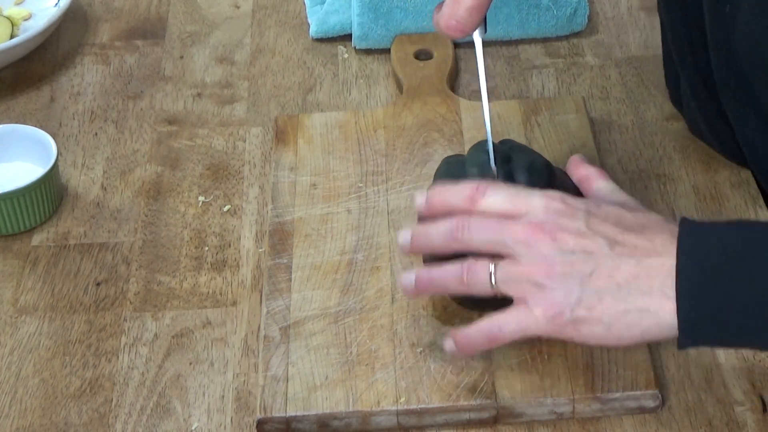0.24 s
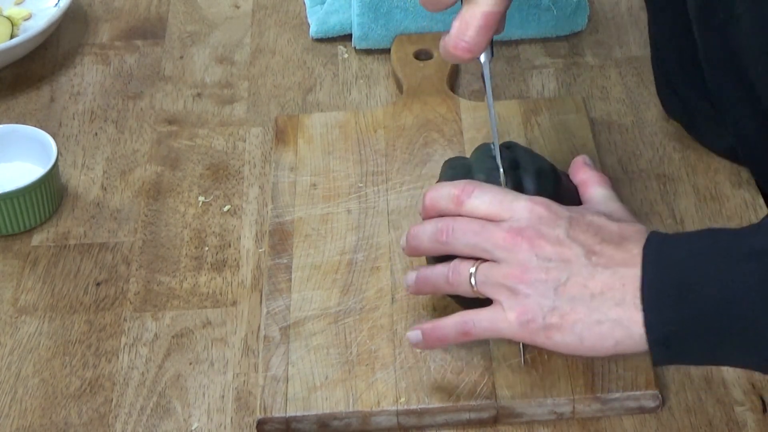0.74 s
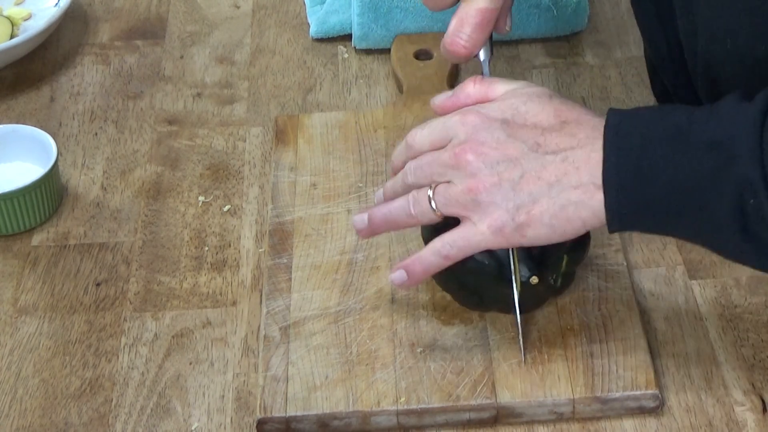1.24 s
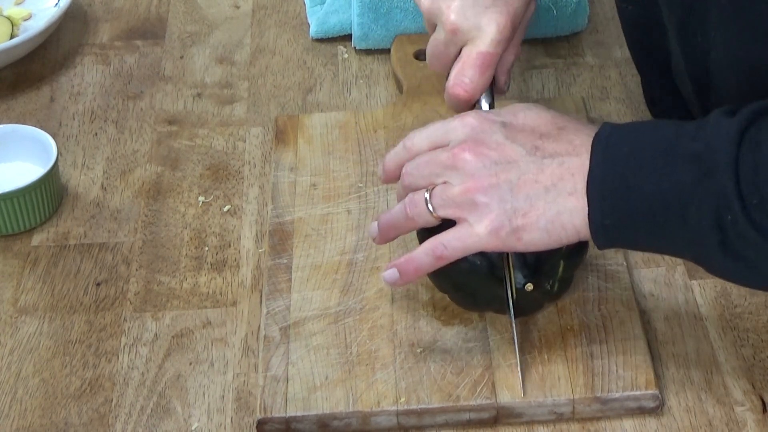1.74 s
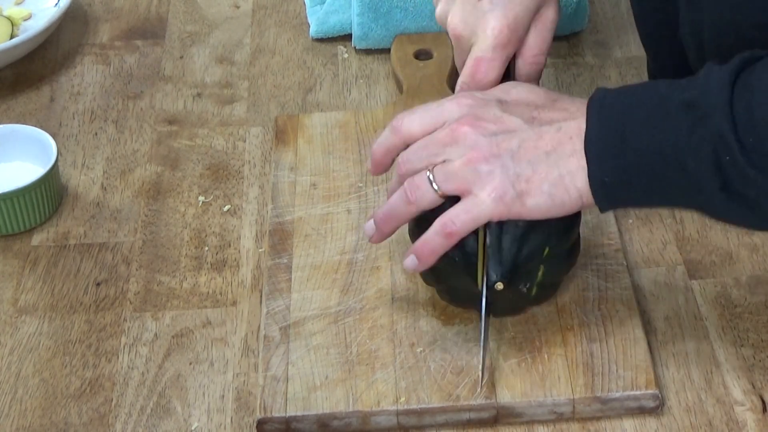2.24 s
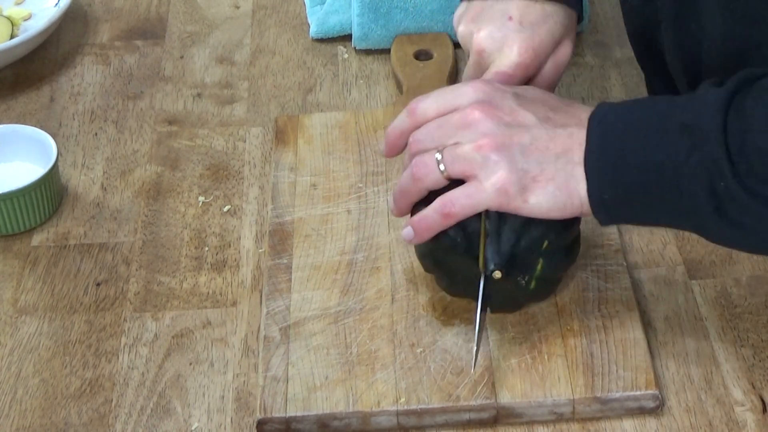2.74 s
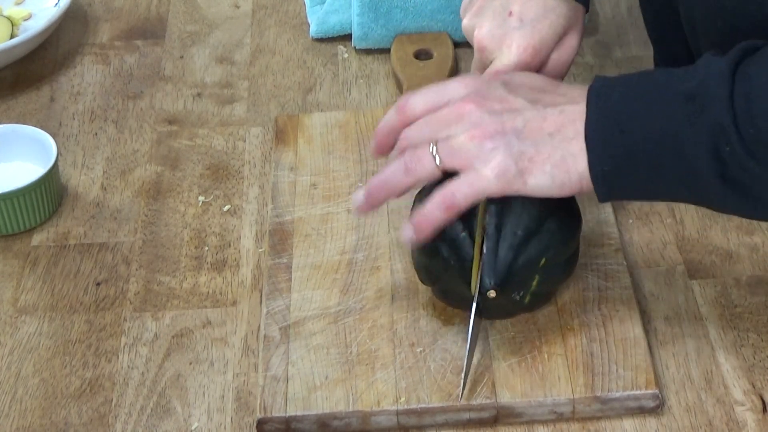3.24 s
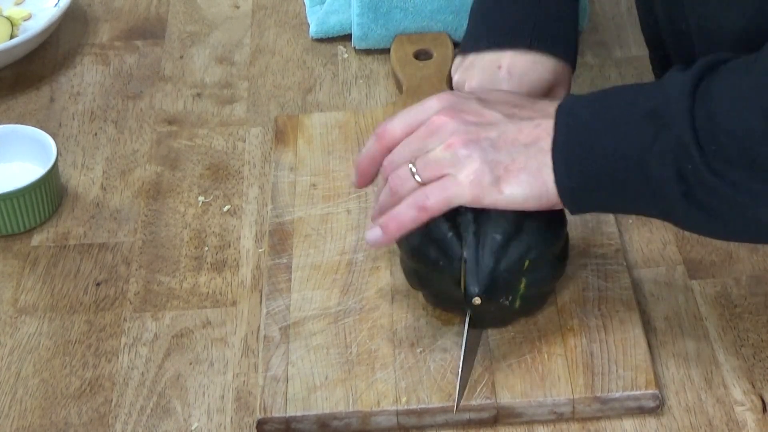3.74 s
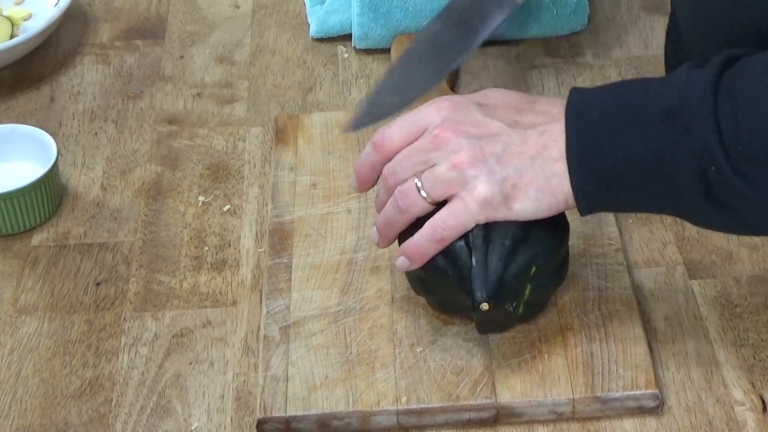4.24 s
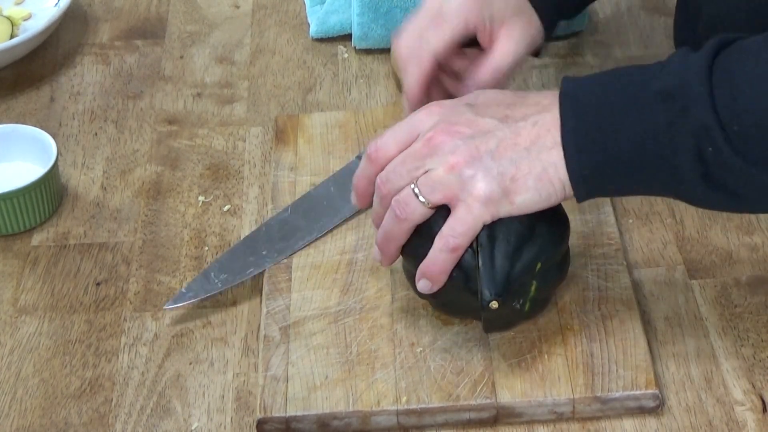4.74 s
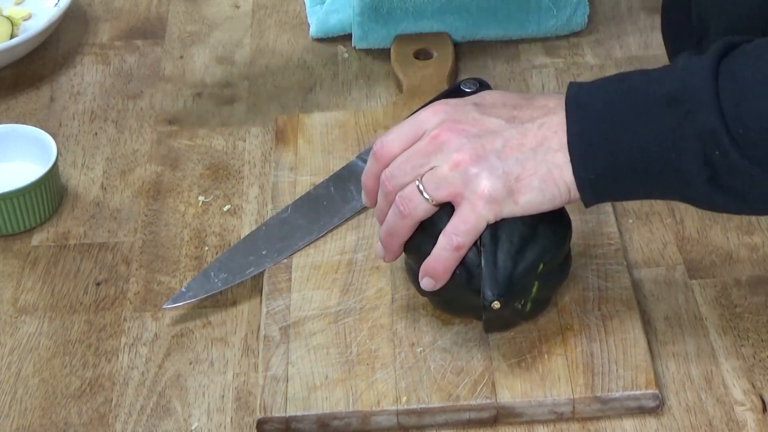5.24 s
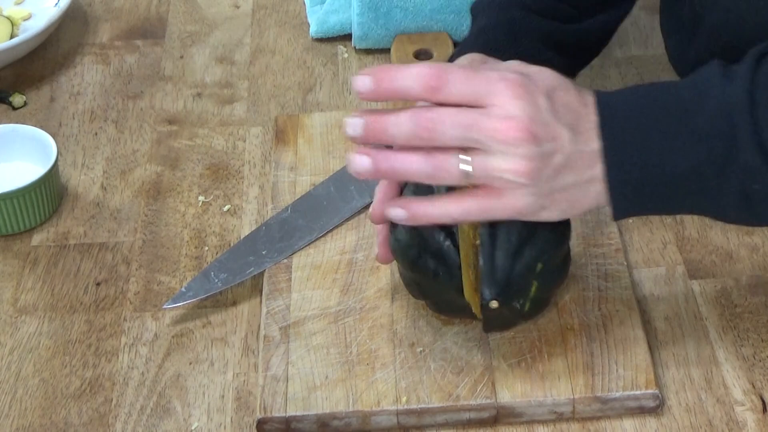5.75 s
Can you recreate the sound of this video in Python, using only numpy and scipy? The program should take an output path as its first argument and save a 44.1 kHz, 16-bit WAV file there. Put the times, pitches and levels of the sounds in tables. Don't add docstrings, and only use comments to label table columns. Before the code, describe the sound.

Close dry rind snaps, dull board knocks and rubbing steel, a ringing knife dropped on wood, and late splits over faint camera hiss.

```python
import sys
import numpy as np
from scipy import signal
from scipy.io import wavfile
from scipy.ndimage import uniform_filter1d, minimum_filter1d

SR = 44100
rng = np.random.default_rng(int(sys.argv[2]) if len(sys.argv) > 2 else 0)


def waveform_to_disk(signal):
    frames = np.transpose(np.atleast_2d(signal))
    scaled = np.clip(frames, -1, 1) * 32767
    samples = np.round(scaled).astype(np.int16)
    wavfile.write(sys.argv[1], SR, samples)


def invert_db(x):
    u = np.asarray(x, float) / 20
    return 10 ** u


N = 264600

# pitch_hz, density_db (per Hz)
AIR_SPECTRUM = [(24, -50.5), (40, 2), (104, 4), (194, -12), (433, 4.5), (516, -17.5), (585, 1.5),
                (1630, -1.5), (1760, 0), (3220, -4), (4030, -3), (4930, -8.5), (5580, -6), (14800, -14.5),
                (16000, -21)]
# pitch_hz, likeness (0-1)
AIR_LIKENESS = [(60, 0.93), (180, 1), (550, 0.1), (1650, 0.65), (5000, 0.49), (15000, 1)]
# pitch_hz, t60_s
ROOM_T60 = [(60, 0.58), (250, 0.59), (1000, 0.67), (4000, 0.61), (8000, 0.58), (14000, 0.35)]
# pitch_hz, level_db
ROOM_TONE = [(60, 7), (250, 6), (1000, 2.57), (4000, -1), (8000, -1.5), (14000, 1.5)]
# pitch_hz, likeness (0-1)
ROOM_LIKENESS = [(60, .93), (300, .9), (600, .68), (1650, .72), (5000, .8), (14000, .99)]

# time_s, pitch_hz, level_db
SQUEAK = [
    (2.27, 4700, -78),
    (2.3, 5000, -67),
    (2.34, 5300, -69),
    (2.37, 6000, -68),
    (2.4, 6150, -71),
    (2.42, 6200, -85),
]

# start_s, length_s, level_db, centre_hz
PUSHES = [
    (2.26, 0.15, -64.5, 3940),
    (2.66, 0.038, -59, 3100),
    (3.02, 0.11, -74.5, 6100),
    (3.5, 0.082, -49.5, 4900),
]
# start_s, length_s, level_db, centre_hz
SLIDES = [
    (.46, 0.099, -71.5, 3000),
    (.69, 0.14, -54, 3320),
    (1.52, .14, -55, 3100),
    (1.72, 0.075, -55.5, 4400),
    (1.84, 0.096, -64, 4850),
    (3.584, .028, -28, 5400),
    (4.06, 0.21, -64, 5840),
    (4.569, 0.047, -33, 3960),
]
# start_s, length_s, level_db, centre_hz
DRAGS = [
    (0, 0.04, -56, 3870),
    (.88, 0.28, -70, 3240),
    (1.2, 0.31, -61.5, 4000),
    (4.528, 0.079, -35.5, 4460),
    (5.612, 0.24, -63, 5270),
]
PUSH, SLIDE, DRAG = (1, 1.3), (0.43, 1.84), (0.11, 1.63)

BLADE_HZ = [2190, 3022, 3270, 3782, 4620, 5360, 5862, 6380, 6810, 7375, 7660, 7932, 8543, 8950, 9870, 10020,
            10110, 10910, 11380, 13000, 14870]
# wedged_db (in the rind), clattering_db, lying_free_db, t60_s
BLADE_MODES = [(-49.5, -5, -17, 0.18), (-38, -10.5, -2.5, 0.43), (-34.5, -7, -23, 0.14), (-38, 0.5, 6, 0.1),
               (-42.5, -3, -23, 0.086), (-39, -23.5, 0, 0.12), (-47.5, -19.5, -33, 0.098),
               (-37.5, -6, -0.5, 0.21), (-34.5, -12, -11, 0.083), (-37.5, -1.5, 0, 0.22),
               (-42.5, -11, 3, 0.077), (-37.5, -3.5, -10, 0.15), (-30, -10, -1.5, 0.25),
               (-37, -2.5, -21, 0.17), (-37.5, -4.5, 4.5, 0.18), (-4.5, -33, -27.5, 0.28),
               (-41, -10.5, 5, 0.11), (-11, -19, -22, .1), (-38.5, -14, 3, 0.16), (-37.5, -34, -24, .15),
               (-28.5, -39, -37, .2)]
# start_s, level_db, grip (0 wedged, 1 clattering, 2 lying free)
BLADE_HITS = [
    (3.618, -31, 0),
    (4.454, -35, 1),
    (4.526, -31, 1),
    (4.541, -30, 1),
    (4.586, -28, 1),
    (4.627, -31, 1),
    (4.686, -29, 2),
]

# start_s, peak_db, centre_hz, room_db
SHIFTS = [(.002, -51.5, 560, -3.5), (.13, -53.5, 474, -7), (.259, -55, 295, -17), (.508, -58, 256, -7.5),
          (1.903, -49, 435, -18.5), (2.159, -59, 147, -19), (2.209, -69, 129, -30),
          (3.237, -55.5, 468, -6.5), (3.291, -62, 460, -13.5), (3.344, -48.5, 426, -16),
          (5.839, -49.5, 307, -8), (5.898, -50, 192, -17), (5.947, -52, 178, -27)]
# start_s, peak_db, centre_hz, room_db
KNOCKS = [(.4117, -37, 600, -15.5), (.931, -43.5, 550, -9), (1.185, -35, 1090, -11.5),
          (1.232, -40, 616, -6.5), (2.714, -27.5, 824, -6.5), (2.807, -36.5, 376, -20),
          (3.576, -22.5, 850, -10), (4.454, -29.5, 624, -4), (4.526, -32, 850, 4.5),
          (5.611, -27.5, 1530, -9.5), (5.696, -33, 1230, -1)]
# start_s, peak_db, centre_hz, room_db
HOLLOWS = [
    (.766, -32, 429, -14),
    (.992, -46, 358, -19.5),
    (1.606, -29, 543, -12.5),
    (3.405, -39.5, 334, -14),
    (5.499, -23.5, 1097, -5),
]
# start_s, peak_db, centre_hz, room_db
BLOWS = [
    (3.614, -7.5, 762, -4.5),
    (4.628, -12.5, 830, -4),
    (4.641, -16, 580, -5.5),
    (4.658, -14.5, 880, -11),
]
# start_s, peak_db, centre_hz, room_db
LEANS = [
    (.53, -60, 85, -15),
    (1.26, -65.5, 85, -12.5),
    (2.76, -55.5, 80, -5.5),
    (3.24, -58.5, 150, -14),
    (3.585, -43, 85, -6),
    (4.13, -54, 240, -10),
    (5.88, -59.5, 90, -10),
]
# start_s, peak_db, centre_hz, room_db
NOTES = [
    (3.404, -24, 790, -8),
    (1.231, -33.5, 985, -22),
]
# start_s, peak_db, centre_hz, room_db
CLANKS = [
    (4.526, -16, 3450, -17),
    (4.542, -24.5, 4670, -20),
    (4.577, -18.5, 2890, -14),
    (4.587, -17.5, 4656, -20.5),
    (4.629, -17, 3930, -19),
    (4.687, -18, 4090, -12),
    (3.405, -32.5, 4170, -9),
]
# (width_octaves, cycles rung until 60 dB down)
SHIFT, KNOCK, HOLLOW, BLOW = (1.55, 8.6), (1.987, 12.3), (1.15, 27), (1.95, 21)
LEAN, NOTE, CLANK = (1.9, 4.2), (0.82, 12), (0.16, 68)

# start_s, peak_db, centre_hz,
# room_db
TICKS = [(.2672, -47, 3500, -16), (.4123, -31, 2250, -14.5), (.7682, -32.5, 2450, -30),
         (.9318, -29, 3320, -18.5), (1.186, -36.5, 2930, -14), (1.231, -39, 2880, -17),
         (1.6073, -32.5, 2200, -26), (2.052, -53, 2500, -27), (2.1718, -44.5, 4000, -12),
         (3.0933, -48, 3900, -13), (3.9353, -23, 2130, -12), (4.064, -41.5, 3060, -6.5),
         (4.1344, -47, 3500, 2), (4.6293, -3.5, 2220, -23.5), (4.6572, -7, 1980, -42),
         (4.7268, -12, 2470, -13), (5.4393, -23.5, 3300, -15), (5.9995, -29, 4550, -24)]
# start_s, peak_db, centre_hz, room_db
PINGS = [(1.13, -51.5, 8800, -10), (2.382, -58, 7900, -16), (2.804, -31, 4940, -36),
         (3.045, -63, 8800, -16), (3.4052, -27.5, 5450, -14.5), (3.4054, -14, 1840, -17.5),
         (4.5252, -17, 5000, -14), (5.0988, -44, 2800, -28), (5.4102, -50.5, 1380, -13),
         (.933, -43, 8700, -11), (1.187, -37, 8900, -14.5), (2.7088, -27, 13100, -11.5),
         (.934, -39.5, 3260, -4.5), (1.2157, -37, 5000, -19)]
# start_s, peak_db, centre_hz, room_db
SPLITS = [(2.7085, -10, 5440, -10), (2.7156, -10.5, 4230, -31), (2.722, -3, 4040, -25.5),
          (3.5762, -7.5, 2670, -8.5), (3.5876, -10, 6260, -12), (3.6128, 1.5, 2960, -6.5),
          (4.4542, -6.5, 3890, -11.5), (5.4988, -4, 2570, -13), (5.5025, -3.5, 2540, -13.5),
          (5.6115, -7.5, 3100, -12.5), (5.696, -14.5, 1960, -21.5)]
# start_s, peak_db, centre_hz, room_db
RATTLES = [
    (3.5946, -9, 5480, -14.5),
    (4.4555, -19, 9000, -12.5),
    (4.4565, -12, 3380, -26.5),
    (4.5409, -18.5, 4800, -10),
    (4.5575, -16.5, 2590, -8.5),
    (4.5753, -12.5, 3110, -10),
    (4.5855, -21, 3370, -16),
    (4.6867, -16.5, 4400, -14),
]
TICK, PING, SPLIT, RATTLE = (2.46, 2.5), (1, 7.3), (1.63, 1.43), (1.8, 6)   # (width_octaves, length_ms)


def by_kind(*kinds):
    return [tuple(row) + tuple(shared) for rows, shared in kinds for row in rows]


def rms_one(x):
    return x / np.sqrt(np.mean(x ** 2) + 1e-20)


def at_hz(points, hz):
    table_hz, value = np.array(points).T
    return np.interp(np.log(hz), np.log(table_hz), value)


def band(x, hz, octaves, order=1):
    edges = np.clip(hz * 2 ** (np.array([-.5, .5]) * octaves), 15, .45 * SR)
    return signal.sosfilt(signal.butter(order, edges, "band", fs=SR, output="sos"), x)


def ring(clicks, hz, t60):
    radius, turn = invert_db(-60 / (t60 * SR)), 2 * np.pi * hz / SR
    return signal.lfilter([0, np.sin(turn)], [1, -2 * radius * np.cos(turn), radius ** 2], clicks + 1e-18)


def add(pair, s, sound, level_db, room_db, smooth=None):
    at = max(round(s * SR), 0)
    if smooth is None:
        to_room = sound
    else:
        to_room = rms_one(smooth) * np.sqrt(np.mean(sound ** 2))
    both = np.array([sound, invert_db(room_db) * to_room])[:, :N - at] * invert_db(level_db)
    pair[:, at:at + both.shape[1]] += both


def stereo_bands(size, tone, likeness, t60=None):
    out, t = 0, np.arange(size) / SR
    white = rng.standard_normal((2, 2, size))
    for k, hz in enumerate(36 * 2 ** np.arange(0, 9, .5)):
        mid, side = band(white[k % 2], hz, 0.69, order=2)
        alike = np.clip(at_hz(likeness, hz), 0, 1)
        decay = invert_db(-60 * t / at_hz(t60, hz)) if t60 else 1
        stereo = np.sqrt(1 + alike) * mid + np.sqrt(1 - alike) * side * [[1], [-1]]
        out = out + invert_db(at_hz(tone, hz)) * decay * stereo
    return out


def room_air():
    return invert_db(-64 + 0.4) * rms_one(stereo_bands(N, AIR_SPECTRUM, AIR_LIKENESS))


def camera():
    first_s, ticks_per_s, tick_hz, tick_db = -1.34, 29, 3206, -59.5
    hiss_hz, hiss_width_hz, hiss_db = 4900, 700, -69.5
    clicks = np.zeros(N)
    at = (np.arange(first_s - .004, 4.7, 1 / ticks_per_s) * SR).astype(int)
    clicks[at] = invert_db(tick_db + 1.5 * rng.standard_normal(len(at)))
    swell = ring(ring(clicks, tick_hz, .018), tick_hz, .018)
    hiss = band(rng.standard_normal(N), hiss_hz, hiss_width_hz / hiss_hz * 1.2, order=2)
    return swell / 30 + invert_db(hiss_db) * rms_one(hiss)


def kitchen(x):
    tail = stereo_bands(SR, ROOM_TONE, ROOM_LIKENESS, ROOM_T60)
    tail = tail * np.clip((np.arange(SR) / SR - .002) / 0.003, 0, 1)
    tail = tail / np.sqrt(np.sum(tail ** 2) / 2)
    return signal.fftconvolve(x[None], tail, axes=1)[:, :N] * invert_db(10)


def squeak():
    s, hz, level_db = np.transpose(SQUEAK)
    t = np.arange(N) / SR
    tone = np.sin(2 * np.pi * np.cumsum(np.interp(t, s, hz)) / SR)
    return tone * invert_db(np.interp(t, s, level_db, left=-200, right=-200))


def rubs():
    out = np.zeros((2, N))
    grit = rng.standard_normal(N) * invert_db(1.8 * rng.exponential(1, N))
    for start, length, level_db, hz, swell, octaves in by_kind((PUSHES, PUSH), (SLIDES, SLIDE), (DRAGS, DRAG)):
        peak, end = start + np.clip(swell, .05, .95) * length, start + length
        t = np.arange(max(start, 0), end, 1 / SR)
        stroke = invert_db(np.interp(t, [start, peak, end], [-14, 0, -16]))
        at = round(t[0] * SR)
        rub = rms_one(band(grit[at:at + len(t)], hz, octaves, order=2))
        add(out, start, rub * stroke, level_db, -9)
    return out


def blade():
    twin_share, twin_db = .0035, -6
    clatter_damp, other_damp = 2.2, 1.6
    wood_dulls_db_oct = -6
    out, t = np.zeros(N), np.arange(SR // 2) / SR
    modes = np.array(BLADE_MODES)
    luck = rng.standard_normal((len(BLADE_HITS), len(modes)))
    dull_db = wood_dulls_db_oct * np.maximum(np.log2(np.array(BLADE_HZ) / BLADE_HZ[3]), 0)
    turns = 2 * np.pi * t[:, None] * np.array(BLADE_HZ)
    tones = np.sin(turns) + invert_db(twin_db) * np.sin(turns * (1 + twin_share))
    ends = [row[0] for row in BLADE_HITS[1:]] + [N / SR]
    for (s, hit_db, held), end, strength in zip(BLADE_HITS, ends, luck):
        grip = round(held)
        gains = invert_db(hit_db + modes[:, grip] + 2.2 * strength + dull_db * held / 2)
        damp = clatter_damp if grip == 1 else other_damp
        decay = invert_db(-60 * t[:, None] / modes[:, 3] * damp)
        choke = invert_db(-700 * np.maximum(t - (end - s), 0)) if held < 1.5 else 1
        out[round(s * SR):][:len(t)] += (tones * decay @ gains) * choke
    return out


def thuds():
    out = np.zeros((2, N))
    rows = by_kind((SHIFTS, SHIFT), (KNOCKS, KNOCK), (HOLLOWS, HOLLOW), (BLOWS, BLOW),
                   (LEANS, LEAN), (NOTES, NOTE), (CLANKS, CLANK))
    click = np.r_[1., np.zeros(4000)]
    draws = rng.standard_normal((len(rows), 2, 10))
    for (s, peak_db, hz, room_db, octaves, cycles), draw in zip(rows, draws):
        t60 = cycles / hz
        spread = np.linspace(-1, 1.2, 10) + 0.047 * draw[0]
        gains = invert_db(4.64 * draw[1] - 9.2 * np.abs(spread)) * (-1) ** np.arange(10)
        knock = 0
        for offset, gain in zip(spread, gains):
            mode_hz = hz * 2 ** (offset * octaves * 0.78)
            knock = knock + gain * ring(click, mode_hz, t60 * 2 ** (-.6 * offset))
        even = band(click, hz, octaves, order=2) + 0.1 * band(click, hz * 1.3, 0.54)
        add(out, s - .001, knock / np.abs(knock).max(), peak_db + 2.5, room_db, even)
    return out


def cracks():
    out, t = np.zeros((2, N)), np.arange(1200) / SR
    click = 1. * (t == 0)
    rows = by_kind((TICKS, TICK), (PINGS, PING), (SPLITS, SPLIT), (RATTLES, RATTLE))
    splinters = rng.standard_normal((len(rows), len(t)))
    for (s, peak_db, hz, room_db, octaves, ms), white in zip(rows, splinters):
        low_hz = hz * 2 ** (-octaves / 2)
        high_hz = min(hz * 2 ** (octaves / 2), .45 * SR)
        burst = 2.5 * click + white * invert_db(-20 * t / (ms / 1000))
        both = signal.sosfilt(signal.butter(2, low_hz, "high", fs=SR, output="sos"), [burst, click])
        snap, even = signal.sosfilt(signal.butter(4, high_hz * 0.86, fs=SR, output="sos"), both)
        snap = snap + .35 * np.roll(snap, round(.0016 * SR))
        add(out, s - .0002, snap / np.abs(snap).max(), peak_db, room_db + 1, even)
    return out


def scene():
    steel = blade() + squeak()
    direct, send = cracks() + rubs() + steel * invert_db([[0], [-9]])
    knock, knock_send = thuds()
    near = direct * invert_db([[-.3], [.3]]) + knock * invert_db([[-1.4], [1.4]])
    tail = kitchen(send + knock_send) * invert_db([[-.7], [.7]])
    return near + tail + room_air() + camera()


def roll_off(x):
    return signal.sosfilt(signal.butter(12, 16510, fs=SR, output="sos"), x)


def record(dry):
    ceiling_db, release_db_s = -4.5, 200
    x = signal.sosfilt(signal.butter(3, 100, "high", fs=SR, output="sos"), dry)
    x = signal.sosfilt(signal.cheby2(18, 50, 16300, fs=SR, output="sos"), x)
    over_db = np.maximum(20 * np.log10(np.abs(x).max(axis=0) + 1e-9) - ceiling_db, 0)
    ramp = release_db_s * np.arange(N) / SR
    cut_db = np.maximum.accumulate(over_db + ramp) - ramp
    cut_db = uniform_filter1d(-minimum_filter1d(-cut_db, size=89), size=45)
    return roll_off(x * invert_db(-cut_db))


dry = scene()
out = record(dry)
waveform_to_disk(out)
```